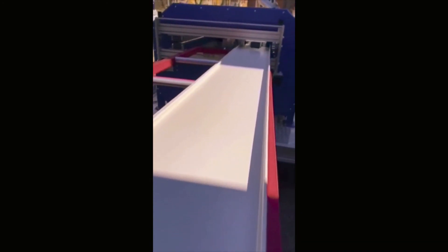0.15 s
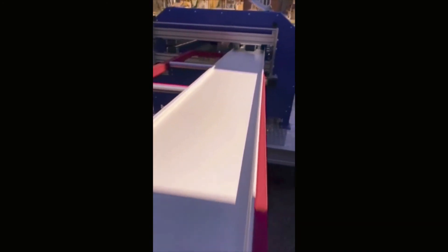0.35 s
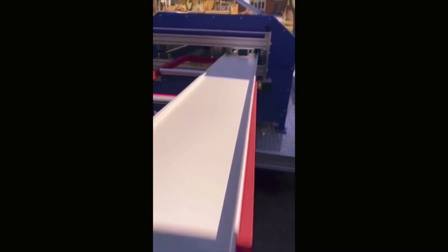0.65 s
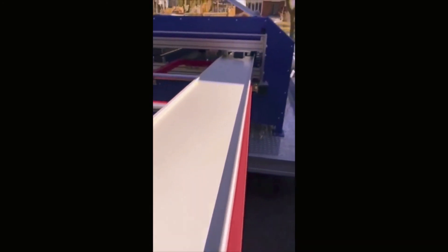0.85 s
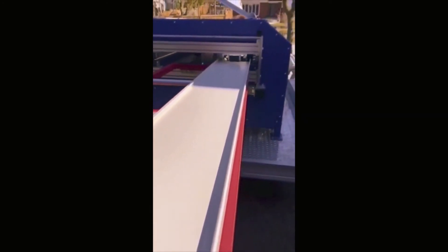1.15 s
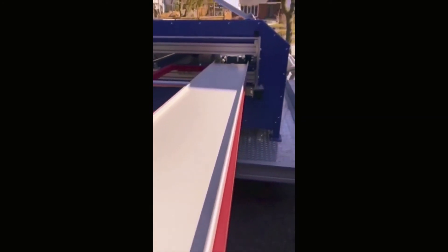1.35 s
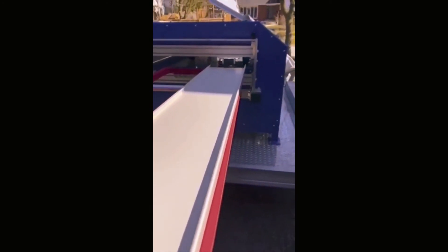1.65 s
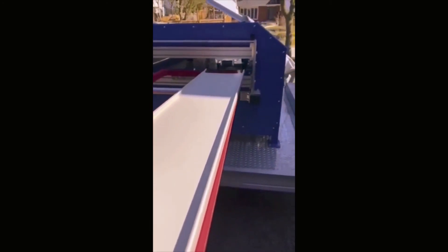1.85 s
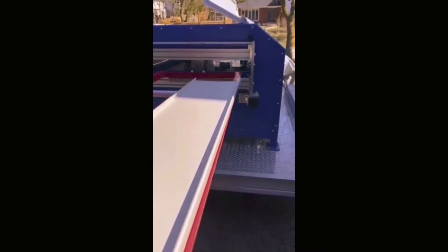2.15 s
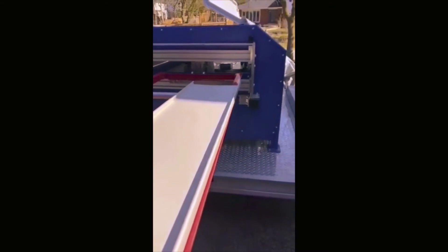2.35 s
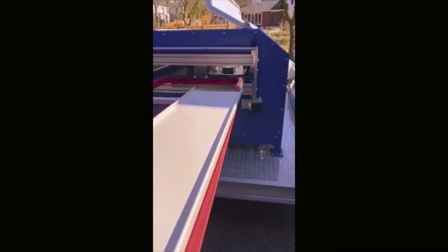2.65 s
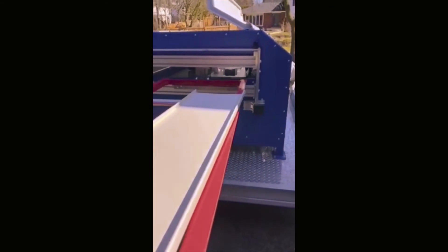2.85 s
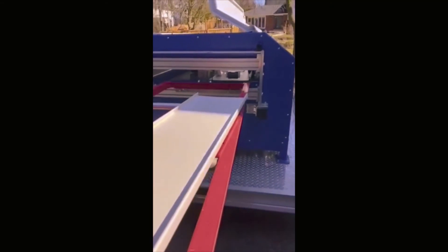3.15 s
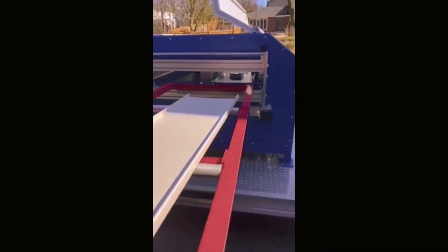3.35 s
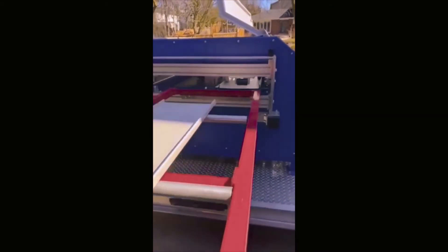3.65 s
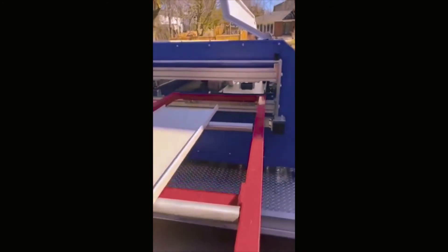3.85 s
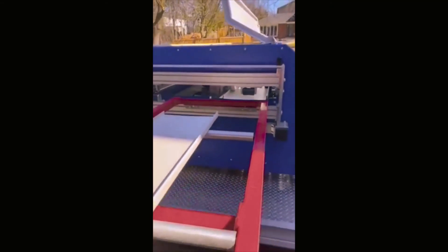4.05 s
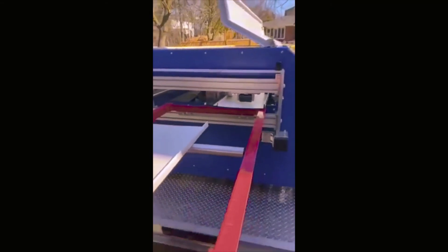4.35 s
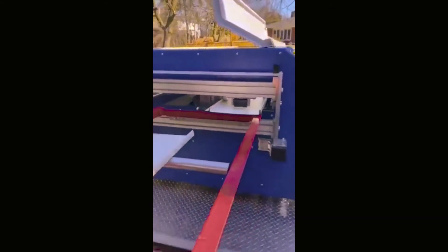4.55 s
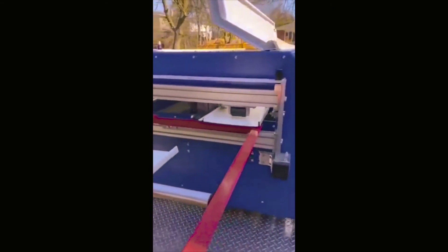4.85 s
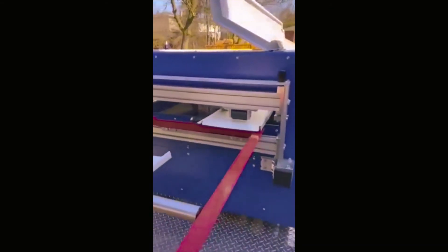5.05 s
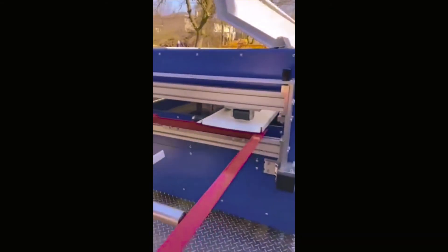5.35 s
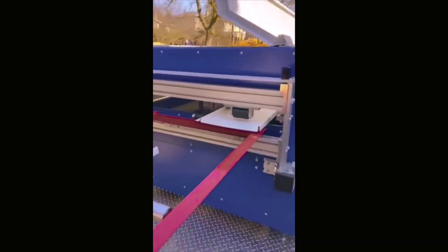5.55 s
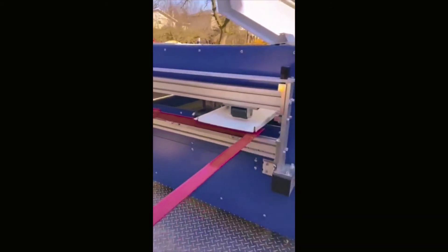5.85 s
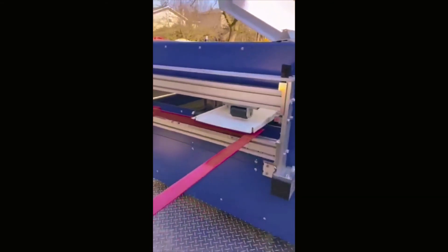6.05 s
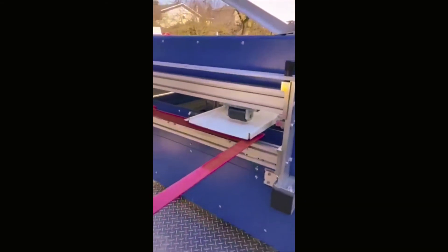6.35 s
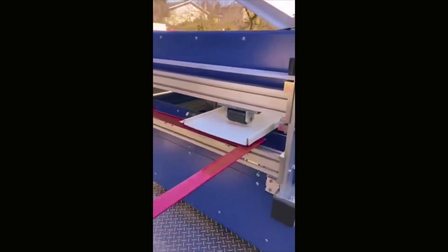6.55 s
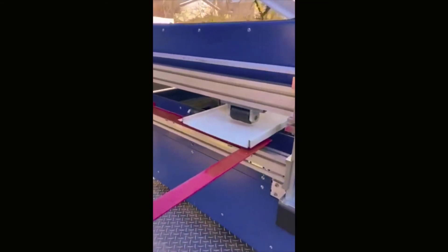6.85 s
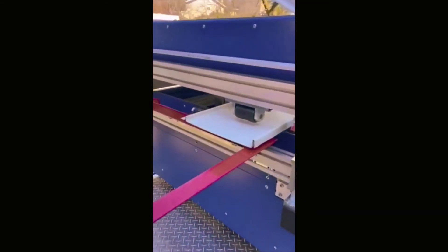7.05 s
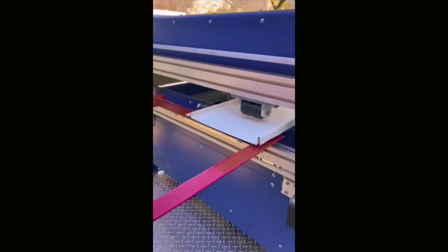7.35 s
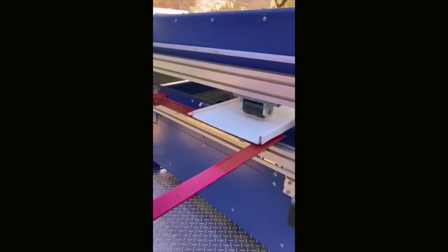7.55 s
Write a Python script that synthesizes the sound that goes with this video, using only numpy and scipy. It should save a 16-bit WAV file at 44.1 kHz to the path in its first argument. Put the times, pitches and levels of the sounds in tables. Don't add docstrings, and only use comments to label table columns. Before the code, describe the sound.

Outdoors, very close stereo microphone. A long steel panel slides off a machine's rollers with hollow drumming, rough scraping and repeated thunks and clangs, over frame rumble and a surging low motor hum. Around three seconds the drag thins out, two sharp snaps click, and a few ringing metal clanks follow. Then it falls nearly silent: faint rumble, tiny ticks and one brief squeaky slide.

```python
import sys
import numpy as np
from scipy import signal
from scipy.fft import rfft, irfft, next_fast_len
from scipy.io import wavfile
from scipy.ndimage import uniform_filter1d

SR = 44100
rng = np.random.default_rng(int(sys.argv[2]) if len(sys.argv) > 2 else 0)


def bounce(signal):
    frames = np.transpose(np.atleast_2d(signal))
    limited = np.clip(frames, -1, 1)
    pcm = np.round(limited * 32767).astype(np.int16)
    wavfile.write(sys.argv[1], SR, pcm)


def gain_from_db(level_db):
    decades = np.asarray(level_db, float) / 20
    return 10 ** decades


N = 339127


def at_hz(points, hz):
    table_hz, values = np.array(points)[:, 0], np.array(points)[:, 1]
    return np.interp(np.log(hz), np.log(np.maximum(table_hz, 1)), values)


def in_time(rows):
    s, *columns = np.transpose(rows)
    return [np.interp(np.arange(N) / SR, s, c, left=-120, right=-120) for c in columns]


def rms_one(x):
    return x / np.sqrt(np.mean(x ** 2) + 1e-20)


def band(x, low_hz, high_hz):
    sections = signal.butter(2, [low_hz, high_hz], "band", fs=SR, output="sos")
    return rms_one(signal.sosfilt(sections, x))


def drift(rate):
    r = np.exp(-80 * np.pi * rate / SR)
    noise = rng.standard_normal(N // 40 + 2002)
    slow = signal.lfilter([1], [1, -2 * r, r * r], noise)[2000:]
    return np.interp(np.arange(N) / 40, np.arange(len(slow)), rms_one(slow))


def resonate(x, peaks):
    out = 0
    for k, (hz, width, db) in enumerate(peaks):
        r = np.exp(-np.pi * width / SR)
        gain = gain_from_db(db) * (1 - r * r) / 2 * (-1) ** k
        poles = [1, -2 * r * np.cos(2 * np.pi * hz / SR), r * r]
        out = out + signal.lfilter([gain, 0, -gain], poles, x)
    return out


def grit(per_s, spread_db):
    size_db = spread_db * np.minimum(rng.exponential(1, (2, N)), 4)
    sizes = gain_from_db(size_db) * rng.standard_normal((2, N))
    struck = rng.random((2, N)) < per_s / SR
    return rms_one(sizes * struck + 1e-9)


def coloured(source, spectrum, patchy_db, flicker_hz):
    low_hz, high_hz = spectrum[0][0], spectrum[-1][0]
    size = 16 * next_fast_len(N // 16 + 1)
    step = 8 if high_hz < 2300 else 1
    hz = np.maximum(np.arange(size // step // 2 + 1) * SR / size, 1)
    inside = (hz > low_hz) & (hz < high_hz)
    whole = rfft(source, size)[:, :len(hz)] * gain_from_db(np.where(inside, at_hz(spectrum, hz), -99))
    out, together = 0, drift(flicker_hz)
    for centre in np.arange(np.log2(low_hz), np.log2(high_hz) + .5, .5):
        slice_ = np.maximum(1 - 2 * abs(np.log2(hz) - centre), 0)
        flicker = np.pad(together + drift(flicker_hz), (0, size - N))[::step]
        out = out + irfft(whole * slice_, size // step) * gain_from_db(patchy_db * flicker)
    return rms_one(irfft(rfft(out), size)[:, :N])


def bursts(rows, rise_db_per_s, fall_db_per_s):
    start, length, db, change_db = np.transpose(rows)[:, :, None]
    t = np.arange(0, N + 64, 64) / SR
    since, length = t - start, np.maximum(length, .01)
    shape_db = change_db * np.clip(since / length, 0, 1)
    shape_db = shape_db + rise_db_per_s * np.minimum(since, 0)
    shape_db = shape_db - fall_db_per_s * np.maximum(since - length, 0)
    gain = np.sqrt((gain_from_db(db + shape_db) ** 2).sum(0))
    return np.interp(np.arange(N) / SR, t, gain)


# [f/Hz, width/Hz, from t/s, to t/s]
WHINE_BANDS = [
    (15620, 260, 1.6, 4.35),
    (8000, 12, 3.8, 7.69),
    (8100, 700, 3.95, 4.16),
    (12000, 12, 7.3, 7.69),
]
WHINE_LEVELS = [-53, -80, -64, -92]


def whines():
    out, t = 0, np.arange(N) / SR
    for (hz, width, start, end), db in zip(WHINE_BANDS, WHINE_LEVELS):
        mode = [(hz, width, 0)]
        tone = resonate(resonate(rng.standard_normal((2, N)), mode), mode)
        fade = np.clip(np.minimum(t - start, end - t + .03) / .05, 0, 1)
        out = out + gain_from_db(db) * fade * rms_one(tone)
    return out


# [t/s, level/dB]
FRAME_SHAKING = [(0.0, -22), (0.08, -27.5), (0.3, -37.5), (0.8, -34), (1.28, -26), (1.5, -29.5),
                 (1.95, -30), (2.2, -29.5), (2.45, -30), (2.74, -32), (3.0, -35), (3.23, -36.5),
                 (4.07, -36), (4.7, -43.5), (5.2, -53), (6.6, -53.5), (7.3, -51.5), (7.69, -54)]
# [f/Hz, level/dB per Hz]
DEEP_SPECTRUM = [(26, -35), (36, -17.5), (48, -12.5), (75, -7), (100, -8), (125, -22)]
# [f/Hz, level/dB per Hz]
UPPER_SPECTRUM = [(95, -25), (120, 4.5), (170, -1.5), (220, -8.5), (270, -9.5)]


def rumble():
    traffic_db = -51
    shake_db, = in_time(FRAME_SHAKING)
    deep_gain = np.hypot(gain_from_db(0.96 * shake_db - 4), gain_from_db(traffic_db))
    deep = deep_gain * coloured(rng.standard_normal((2, N)), DEEP_SPECTRUM, patchy_db=0.96, flicker_hz=17)
    upper = coloured(rng.standard_normal((2, N)), UPPER_SPECTRUM, patchy_db=0.63, flicker_hz=4.4)
    return deep + gain_from_db(1.118 * shake_db + 2) * upper


# [start t/s, length t/s, first, second and higher orders level/dB]
DRIVE_SURGES = [(0.0, 0.054, -37.5, -30, -28.5), (0.33, 0.1, -45.5, -45, -33.5),
                (0.43, 0.22, -29, -28, -29.5), (0.7, 0.13, -29, -40, -30.5), (0.865, 0.28, -27.5, -27, -33),
                (1.2, 0.065, -39, -34, -35), (1.314, 0.2, -40.5, -23.5, -28), (1.56, .12, -41, -31, -42),
                (1.72, 0.24, -27.5, -36, -33), (1.95, 0.23, -43, -36.5, -30.5),
                (2.46, 0.2, -26.5, -36, -38), (2.72, 0.25, -28.5, -36, -43.5),
                (3.02, 0.11, -32.5, -48, -57)]
# [multiple of the turning rate, level/dB]
HIGHER_ORDERS = [(3, -8.5), (4, -10), (5, -2.5), (6, -10.5)]


def drive():
    turning_hz = 73.98
    turns = np.cumsum(turning_hz * (1 + 0.004 * drift(1.4))) / SR
    first, second, upper = (
        bursts([(row[0], row[1], row[k], 0) for row in DRIVE_SURGES], rise_db_per_s=168.5, fall_db_per_s=166)
        for k in (2, 3, 4))
    higher = 0
    for order, db in HIGHER_ORDERS:
        tone = np.sin(2 * np.pi * (order * turns + rng.random()))
        higher = higher + gain_from_db(db + 2.0 * drift(2.5)) * tone
    hum = first * np.sin(2 * np.pi * turns) + second * np.sin(4 * np.pi * turns + 1) + upper * higher
    return hum * [[1], [0]]


# [t/s, peak level/dB, ring f/Hz, ring t60
# t/s, crack over ring level/dB]
SMALL_CLICKS = [(0.891, -31.5, 5500, .025, -9), (0.9752, -38, 5000, 0.033, 2.5),
                (0.994, -27, 700, .02, -20), (1.134, -35, 6000, .02, 1), (1.1575, -28, 5000, .03, 8.5),
                (1.3225, -25.5, 5000, .03, 2), (1.3862, -22, 1200, .015, -13),
                (4.505, -64, 4500, 0.026, -12), (4.531, -60, 5200, 0.027, -12),
                (4.591, -30, 3930, 0.025, -5), (4.7707, -51, 1360, 0.077, -16),
                (4.822, -59.5, 3300, 0.036, 3.5), (4.854, -60, 1880, 0.065, -23),
                (5.177, -54, 1775, 0.05, -13), (5.5345, -50, 3300, 0.14, -28),
                (5.8574, -56, 900, 0.071, -12), (5.879, -54.5, 2580, 0.12, 3),
                (5.958, -50, 2490, 0.22, -6), (6.116, -44, 700, 0.05, -23), (6.711, -55, 4700, 0.037, 0),
                (6.7105, -54, 1800, 0.033, -20), (6.728, -60, 3800, .03, -12.5),
                (6.7987, -60, 1480, 0.08, -2), (7.0524, -64.5, 3000, 0.0484, 11),
                (7.108, -56.5, 1310, 0.094, -26.5), (7.34, -61, 5000, 0.051, 14),
                (7.38, -64, 4740, 0.047, -20), (7.449, -60, 4460, 0.05, -10),
                (7.466, -57.5, 4800, 0.044, -3), (7.442, -62, 1400, .08, -20.5),
                (7.4935, -51, 1700, 0.052, -22), (7.4965, -53, 3120, 0.033, -25),
                (7.507, -52, 1400, 0.064, -19), (7.525, -65, 5500, 0.045, 8), (7.55, -68, 5500, .03, 10)]


def ticks():
    out, t = np.zeros((2, N)), np.arange(SR // 8) / SR
    for s, peak_db, ring_hz, t60, crack_db in SMALL_CLICKS:
        noise = rng.standard_normal((2, len(t)))
        fall_db = -60 * t / np.clip(t60, .01, .2)
        ring = resonate(noise, [(ring_hz, 0.22 * ring_hz, 0), (2.25 * ring_hz, 500, -9)])
        hit = rms_one(ring) + gain_from_db(crack_db - 6.5) * band(noise, 8700, 11400)
        hit = hit + 0.22 * gain_from_db(2.2 * fall_db) * band(noise, 1170, 6500)
        onset = (1 - np.exp(-t / 0.00038)) * (1 + 0.75 * np.exp(-t / 0.0013))
        start = round(s * SR) - 40
        out[:, start:start + len(t)] += gain_from_db(peak_db - 1.5 + fall_db) * onset * hit
    return out


# [t/s, level/dB]
SQUEAK_LEVEL = [(5.98, -70), (6.03, -62), (6.1, -48), (6.13, -45.5), (6.2, -44.5), (6.22, -39),
                (6.232, -47.5), (6.27, -55), (6.33, -86)]
# [f/Hz, width/Hz, level/dB]
SQUEAK_MODES = [(780, 44, -9.5), (980, 110, -13), (1270, 32, -17), (1986, 38, -12), (2830, 31, 0),
                (2950, 41, -1.5), (3470, 23, -3.5), (3860, 39, -7), (4120, 73, -10), (4320, 34, -8),
                (5000, 18, -9), (5330, 44, -17), (5460, 34, -19), (5890, 25, -22)]


def squeak():
    out = np.zeros((2, N))
    span = slice(round(SQUEAK_LEVEL[0][0] * SR), round(SQUEAK_LEVEL[-1][0] * SR))
    rub = grit(per_s=9000, spread_db=3.0)[:, span]
    rasp = grit(per_s=9400, spread_db=-2.0)[:, span]
    modes = sum(gain_from_db(1.9 * drift(17)[span]) * resonate(rub, [peak]) for peak in SQUEAK_MODES)
    mix = rms_one(rms_one(modes) + gain_from_db(-5.0) * band(rasp, 1740, 6300))
    out[:, span] = gain_from_db(in_time(SQUEAK_LEVEL)[0][span]) * mix
    return out


# [t/s, peak level/dB]
CATCH_SNAPS = [
    (3.1838, -7),
    (3.1885, -24),
    (3.1925, -25),
    (3.196, -26),
    (3.2156, -9),
    (3.2205, -21),
    (3.2243, -19),
    (3.2262, -22),
]
# [f/Hz, level/dB, t60 t/s]
CATCH_MODES = [(7760, 11.5, 0.0042), (10350, -6.5, 0.006), (11700, -6.5, 0.0051), (15350, 0.5, 0.0055)]


def snaps():
    out, t = np.zeros((2, N)), np.arange(SR // 100) / SR
    ring = sum(gain_from_db(db - 60 * t / t60) * np.sin(2 * np.pi * hz * t) for hz, db, t60 in CATCH_MODES)
    ring = ring * (1 - np.exp(-t / 0.00028))
    for s, peak_db in CATCH_SNAPS:
        start = round(s * SR) - 20
        out[0, start:start + len(t)] += gain_from_db(peak_db + 1) * ring
    return out


# [start t/s, length t/s, f/Hz, glide f/Hz, level/dB]
BUCKLING_HUMS = [
    (0.05, 0.14, 203, 5, -27.5),
    (0.1, 0.091, 130.5, 13.5, -37),
    (0.95, 0.18, 208, 31, -26),
    (1.196, 0.08, 86, 2, -27),
    (1.882, 0.093, 95, -9, -25),
    (2.141, 0.09, 96.5, 14.5, -26),
    (2.401, 0.31, 118.8, -0.5, -37),
    (2.7, 0.052, 135.8, 3, -26.5),
    (2.85, 0.1, 119.8, 7.5, -31.5),
]


def buckles():
    out = np.zeros((2, N))
    for s, length, hz, glide_hz, db in BUCKLING_HUMS:
        part = np.linspace(0, 1, round((length + 0.11) * SR))
        start = max(round((s - .04) * SR), 0)
        cycles = np.cumsum(hz + glide_hz * (part - .5)) / SR
        out[0, start:start + len(part)] += gain_from_db(db + 2) * np.sin(np.pi * part) * np.sin(2 * np.pi * cycles)
    return out


# [start t/s,
# length t/s, f/Hz, width/Hz, level/dB]
SINGING_MODES = [(0.0, 0.24, 1248, 32, -33), (0.458, 0.096, 1275, 30, -40.5), (0.97, .1, 4130, 110, -49),
                 (1.04, .05, 4600, 200, -42), (0.281, 0.32, 1600, 90, -47), (1.722, .14, 560, 20, -36),
                 (1.921, 0.075, 441.6, 12, -33), (1.948, 0.29, 5010, 100, -40),
                 (2.127, 0.094, 634, 19, -33), (2.896, .08, 3050, 140, -48), (3.3, 0.032, 2090, 50, -42.5),
                 (3.314, 0.099, 4500, 85, -44.5), (3.385, 0.072, 1625, 29, -46.5),
                 (3.429, .17, 370, 54, -41.5), (5.2, .1, 2900, 120, -63), (5.538, 0.038, 1640, 120, -58),
                 (5.54, 0.028, 3700, 300, -57), (5.54, .15, 2150, 80, -69), (5.55, .14, 2870, 60, -69.5),
                 (5.985, .1, 3940, 60, -62), (6.019, 0.092, 2930, 60, -58), (5.999, .2, 4450, 60, -63),
                 (6.08, .07, 5500, 150, -61), (6.04, .2, 5010, 60, -60), (6.195, 0.018, 960, 130, -49.5),
                 (6.19, .07, 1270, 30, -56)]


def sings():
    out, t = np.zeros((2, N)), np.arange(SR // 2) / SR
    for s, length, hz, width, db in SINGING_MODES:
        noise, mode = rng.standard_normal((2, SR // 2)), [(hz, width, 0)]
        tone = rms_one(resonate(resonate(noise, mode), mode)[:, ::-1])
        swell = np.minimum(t / 0.017 + (s < .01), 1)
        start = round(max(s - .01, 0) * SR)
        out[:, start:start + len(t)] += gain_from_db(db - 630 * np.maximum(t - length, 0)) * swell * tone
    return out


# [start t/s, modes [f/Hz,
# peak level/dB, t60 t/s]]
STEEL_RINGS = [
    (0.802, [(880, -29, .1), (1000, -19, .1), (2410, -29, .12), (4900, -33, .05)]),
    (1.131, [(3900, -23, .06)]),
    (1.259, [(4240, -31, .06)]),
    (1.337, [(3790, -26, .07)]),
    (3.845, [(843, -36.5, 0.17), (1276, -50, .2), (2126, -42.5, .17), (3020, -43, 0.3), (4102, -48.5, .2), (4920, -40, .12), (5168, -44, .16), (6121, -34, 0.11)]),
    (4.1565, [(858, -28.5, 0.11), (1295, -37.5, .15), (2056, -36, 0.23), (3130, -26.5, .2), (3370, -29, .2), (3860, -35, .2), (4440, -30.5, 0.22), (4520, -26.5, .22), (5020, -29, 0.18), (5260, -22.5, 0.11), (5195, -25.5, .12), (5330, -16.5, 0.099), (5530, -19, .14), (5890, -30.5, 0.17)]),
    (4.5915, [(758, -30, 0.26), (781, -25, 0.19), (833, -26, 0.15), (1030, -36.5, 0.19), (2323, -31, 0.13), (2961, -40.5, .19), (2880, -39, 0.15), (3130, -38, .16), (3858, -31.5, 0.2), (4345, -39, 0.24), (4550, -36, .17), (4800, -38, .25), (5600, -45, 0.2), (6350, -32, 0.14)]),
]


def rings():
    out, t = np.zeros((2, N)), np.arange(SR // 3) / SR
    for s, modes in STEEL_RINGS:
        hz, db, t60 = np.transpose(modes)[:, :, None, None]
        phase = [[.08], [1]] * rng.random((len(modes), 2, 1))
        tone = gain_from_db(db - 60 * t / np.clip(t60, .03, .5)) * np.sin(2 * np.pi * (hz * t + phase))
        start = round(s * SR)
        out[:, start:start + len(t)] += tone.sum(0) * (1 - np.exp(-t / 0.0014)) * [[1], [.5]]
    return out


# [t/s, clang peak level/dB, thunk f/Hz, sizzle over clang level/dB, edge tilt/dB per octave]
RAIL_KNOCKS = [(0.0344, -16, 652, -19, 11), (0.279, -21.5, 646, -14, 12), (0.4289, -22, 593, -13, -4),
               (0.7986, -23, 890, -2.5, -3), (0.8036, -28, 851, -15, -10.5), (0.8904, -31, 650, -10, -4),
               (0.9941, -32, 667, -3, 8), (1.0949, -26.5, 619, -14, -8), (1.1338, -25, 635, -10, 5),
               (1.1578, -25.5, 596, 3.5, -4), (1.181, -21, 622, -11, -3), (1.3279, -20, 639, -8, -4.5),
               (1.3857, -24.5, 645, -22, -7.5), (1.455, -45, 850, -24, 0), (1.7677, -17.5, 935, -32, -2.5),
               (1.8674, -25, 616, -27, -2), (2.0379, -18, 570, -26.5, 33), (2.232, -13, 826, -12.5, 14),
               (2.3077, -16, 760, -10, -2), (2.7739, -21.5, 910, -18, -8.5), (2.786, -26, 1032, -18, -6.5),
               (3.8451, -22.5, 860, 4.5, 6.5), (4.157, -10.5, 869, -2, 11.5), (4.5925, -22.5, 899, 0, 1)]
# [f/Hz, level/dB]
CLANG_MODES = [(1650, -20), (2100, 0), (2320, -2), (2570, -1), (2850, -5.5), (3165, -0.5), (3660, -6.5),
               (3855, -1), (4345, 2), (4550, 3.5), (4860, 2), (5185, 1.5), (5450, -2.5), (5900, -18),
               (6315, -9.5)]


def knocks():
    knock_t60_s = 0.21
    out, t = np.zeros((2, N)), np.arange(SR // 3) / SR
    fall_db = -60 * t / knock_t60_s
    rise = 1 - np.exp(-t / .0022)
    hz, db = np.transpose(CLANG_MODES)
    for s, peak_db, thunk_hz, sizzle_db, tilt_db in RAIL_KNOCKS:
        noise = rng.standard_normal((2, len(t)))
        pitch = hz[:, None] * (1 + 0.012 * rng.standard_normal((len(hz), 1)))
        mode_db = (db + tilt_db * np.log2(hz / 3500))[:, None, None]
        strength = gain_from_db(mode_db + 3.5 * rng.standard_normal((len(hz), 2, 1)))
        phase = rng.random((len(hz), 2, 1))
        modes = (strength * np.sin(2 * np.pi * (pitch[:, None] * t + phase))).sum(0)

        crash = gain_from_db(-tilt_db - 7.0) * band(noise, 1600, 3300) + band(noise, 2300, 7800)
        crash = crash + gain_from_db(tilt_db / 2 - 28) * band(noise, 4600, 5300)
        clang = 0.81 * rms_one(modes) * gain_from_db(-70 * t) + 1.54 * rms_one(crash)

        low = sum(np.sin(2 * np.pi * (thunk_hz * ratio * t + rng.random((2, 1)))) for ratio in (.94, 1.001, 1.11))
        thunk = 0.54 * low + gain_from_db(-2) * band(noise, 550, 1150) + gain_from_db(-21) * band(noise, 2250, 2750)
        thunk_db = 4.5 - 1.2 * tilt_db

        hit = clang * (gain_from_db(fall_db) + gain_from_db(0.5 * fall_db - 11) + 0.21 * gain_from_db(6.0 * fall_db))
        hit += gain_from_db(thunk_db + 0.92 * fall_db) * thunk
        hit += gain_from_db(sizzle_db + 4.0 + 1.05 * fall_db) * band(noise, 7700, 11800)
        start = round(s * SR) - 40
        out[:, start:start + len(t)] += gain_from_db(peak_db - 12.5) * rise * hit
    return out


# [t/s, level/dB]
RAIL_WEIGHT = [(0.0, -13.5), (.21, -27), (.42, -33), (.87, -34), (1.23, -27), (1.64, -36), (1.76, -26.5),
               (2.3, -30.5), (2.39, -34.5), (2.82, -34), (2.92, -52), (3.35, -58), (3.41, -36.5),
               (3.7, -50), (4.4, -52.5), (5.1, -64), (6.4, -67), (7.69, -65)]
# [start t/s, length t/s, scrape level/dB, change over stroke/dB, sizzle over scrape level/dB]
SLIDING_STROKES = [(0.0, 0.34, -22.5, -15.5, -9.5), (0.467, 0.057, -37.5, 1, -19),
                   (1.049, 0.13, -37.5, 1.5, -12), (1.6, 0.075, -45.5, 5, -11),
                   (1.731, 0.17, -34.5, -1, -6), (1.958, 0.23, -31, -2.5, -4), (2.367, 0.44, -50.5, 11, -7),
                   (2.858, 0.45, -40, -5.5, -9), (3.308, 0.38, -37, -8.5, -1),
                   (5.202, 0.31, -53, -11.5, -7.5), (5.552, 0.24, -62, -21, -14),
                   (5.887, 0.038, -62.5, -4, -17), (5.983, 0.055, -57, -5, -14),
                   (6.08, 0.126, -64.5, 10, 0.5), (6.273, 0.078, -62, -3.5, -7),
                   (7.277, .08, -75.5, -0.5, -5)]
# [f/Hz, width/Hz, level/dB]
SHEET_MODES = [(203, 140, 0), (373.6, 2.6, 10.5), (439, 6.7, -4), (585, 120, 8), (636.2, 8.3, 3.5),
               (851, 12, 4), (1053, 26, -4), (1255, 23, 9), (1619, 29, 3.5), (2015, 31, 10), (2963, 15, 2),
               (4114, 34, 11), (4540, 25, -2.5), (5040, 36, 1.5), (5330, 27, 1.5)]
# [f/Hz, level/dB per Hz]
DRUM_SPECTRUM = [(190, -1.5), (240, 1), (330, 1.5), (430, -1.5), (560, -20.5)]
BOOM_SPECTRUM = [(380, -16.5), (480, -4.5), (640, 4), (900, -1), (1250, -6), (1500, -11.5), (2000, -17.5)]
SCRAPE_SPECTRUM = [(1100, -10.5), (1600, -2), (2200, 4.5), (3000, 4), (4500, 0), (6000, -3), (7500, -17.5),
                   (9000, -6.5)]
SIZZLE_SPECTRUM = [(3800, -5.5), (5000, -2.5), (6300, -3), (7400, -1), (9000, -3.5), (10500, -6),
                   (12000, -7), (13500, -12), (14700, -5.5), (15600, -10), (16200, -20)]


def sheet():
    rise_db_per_s, fall_db_per_s = 303.5, 186
    drum_knee_db, air_db = -49.5, -84
    weight_db, = in_time(RAIL_WEIGHT)
    shake_db, = in_time(FRAME_SHAKING)
    slide = bursts([row[:4] for row in SLIDING_STROKES], rise_db_per_s, fall_db_per_s)
    bright_rows = [(s, length, db + over_db, change_db) for s, length, db, change_db, over_db in SLIDING_STROKES]
    bright = bursts(bright_rows, rise_db_per_s, fall_db_per_s)
    contact = grit(per_s=9000, spread_db=-3.5)
    body = contact + gain_from_db(-0.5) * resonate(contact, SHEET_MODES)
    fine_contact = grit(per_s=7300, spread_db=0.5)

    drum_db = np.minimum(weight_db, drum_knee_db + 0.65 * (weight_db - drum_knee_db))
    drum_db = drum_db + 0.082 * shake_db + 7.5
    drum_gain = np.hypot(gain_from_db(drum_db), gain_from_db(-10.5) * slide)
    boom_gain = np.hypot(gain_from_db(weight_db), gain_from_db(-4.5) * slide)
    scrape_gain = np.hypot(gain_from_db(0.92 * weight_db - 13), slide) * gain_from_db(1.5)
    sizzle_gain = np.hypot(gain_from_db(1.15 * weight_db - 21.5) + gain_from_db(air_db), bright) * gain_from_db(8.0)

    drum = drum_gain * coloured(body, DRUM_SPECTRUM, patchy_db=0.83, flicker_hz=8.4)
    boom = boom_gain * coloured(body, BOOM_SPECTRUM, patchy_db=1.54, flicker_hz=17)
    scrape = scrape_gain * coloured(body, SCRAPE_SPECTRUM, patchy_db=1.0, flicker_hz=24)
    sizzle = sizzle_gain * coloured(fine_contact, SIZZLE_SPECTRUM, patchy_db=1.1, flicker_hz=22)
    return drum + boom + scrape + sizzle


# [f/Hz, phase/rad]
LEFT_LEAD = [(0, 0), (2000, .3), (3000, 1.2), (5200, .9), (7380, 3.14), (10600, 6.28), (13600, 9.42),
             (16600, 12.5)]
# [f/Hz, share]
PORT_COHERENCE = [(50, .98), (150, .97), (300, .85), (600, .62), (1200, .6), (2500, .5), (4500, .4),
                  (6000, .62), (16000, .62)]
# [f/Hz, level/dB]
LEFT_OVER_RIGHT = [(60, -0.5), (250, 1.1), (500, -.5), (2000, -0.6), (16000, 0.5)]


def scene():
    size = next_fast_len(N + SR // 10)
    background = whines() + rumble() + drive() + ticks() + squeak() + snaps()
    panel = buckles() + sings() + rings() + knocks() + sheet()
    shared, apart = rfft(background + panel, size)
    hz = np.maximum(np.arange(len(shared)) * SR / size, 1)
    alike = np.clip(at_hz(PORT_COHERENCE, hz), 0, 1)
    lead = np.interp(hz, *np.transpose(LEFT_LEAD))
    port = gain_from_db(at_hz(LEFT_OVER_RIGHT, hz) / 2) * np.exp(.5j * lead)
    shared, apart = shared * np.sqrt((1 + alike) / 2), apart * np.sqrt((1 - alike) / 2)
    return irfft([(shared + apart) * port, (shared - apart) / port], size)[:, :N]


def starve(x):
    weaker_from_hz, weaker_db = 6300, -3.4
    top_hz, top_weaker_db = 12380, -1.7
    quiet_from_hz, quiet_db, cut_hz = 13700, -6.5, 15900
    faint_share, attack_db = .042, 6.6
    count = N // 1024 + 2
    pair = np.pad([x[0] + x[1], x[0] - x[1]], ((0, 0), (1031, (count + 1) * 1024 - N - 1031))) / 2

    n, k = np.arange(2048)[:, None] + 512.5, np.arange(1024) + .5
    window = signal.windows.kaiser_bessel_derived(2048, 4 * np.pi)[:, None]
    basis = np.cos(np.pi / 1024 * n * k) * window / np.sqrt(512)
    halves = pair.reshape(2, -1, 1024)
    frames = (np.concatenate([halves[:, :-1], halves[:, 1:]], 2) @ basis).transpose(0, 2, 1)
    hz = (k * SR / 2048).reshape(32, 32, 1)
    power = frames.reshape(2, 32, 32, -1) ** 2
    band_power = power.mean(2, keepdims=True)
    level_db = 10 * np.log10(band_power + 1e-20)
    treble_db = 10 * np.log10(power[:, 8:19].mean((0, 1, 2)) + 1e-20)

    blocks = (band(pair, 7000, 15000) ** 2).reshape(2, -1, 128).mean((0, 2)) + 1e-9
    jump = blocks > gain_from_db(2 * attack_db) * uniform_filter1d(np.roll(blocks, 6), 8)
    steady = ~jump[4:-4].reshape(-1, 8).any(1)

    lean_db = 10 * np.log10(uniform_filter1d(band_power, 2) + 1e-20)
    limit_db = np.where(hz > top_hz, top_weaker_db, weaker_db)
    weak = (lean_db - lean_db[::-1] < limit_db) & (hz > weaker_from_hz)
    strip = (hz > 15300) & (hz < 15850) & (level_db > -49)
    quiet = (level_db - treble_db < quiet_db) & (hz > quiet_from_hz) & ~strip | (hz > cut_hz)
    faint = power < faint_share * gain_from_db(2 * level_db) * np.clip(hz / 2500, 0, 1)
    dropped = (weak & ~strip | quiet | faint) & steady
    frames = frames * ~dropped.reshape(2, 1024, -1)

    back = frames.transpose(0, 2, 1) @ basis.T
    overlapped = back[:, 1:, :1024] + back[:, :-1, 1024:]
    total, gap = overlapped.reshape(2, -1)[:, 7:N + 7]
    return np.array([total + gap, total - gap])


def low_pass(x):
    return signal.sosfilt(signal.butter(12, 16800, fs=SR, output="sos"), x)


def record(dry):
    rounded = .95 * np.tanh(dry / .95)
    dull = signal.sosfilt(signal.cheby2(10, 60, 16900, fs=SR, output="sos"), rounded)
    return low_pass(starve(dull))


dry = scene()
out = record(dry)
bounce(out)
```